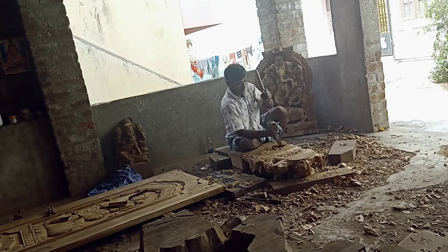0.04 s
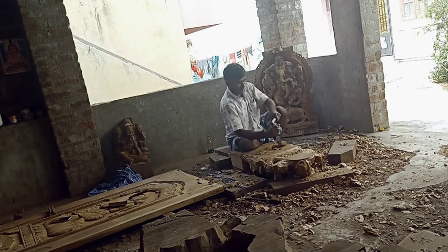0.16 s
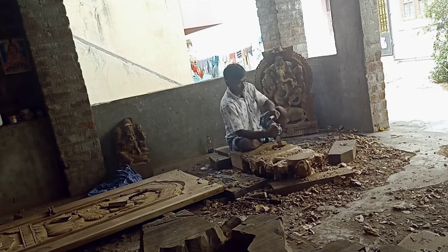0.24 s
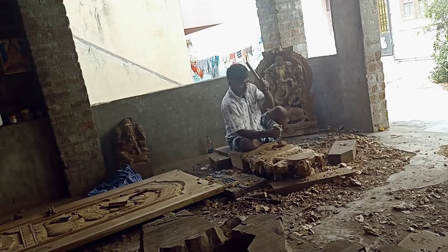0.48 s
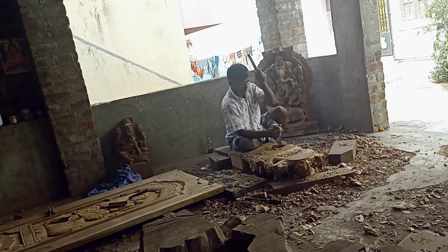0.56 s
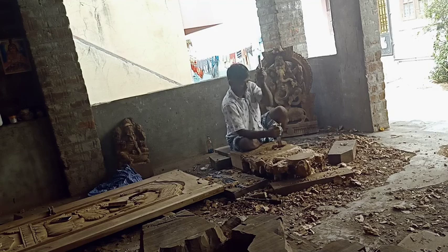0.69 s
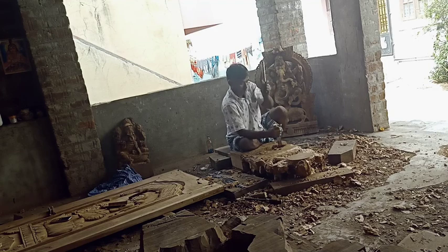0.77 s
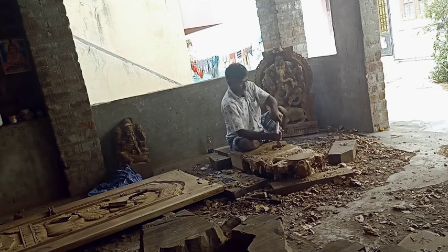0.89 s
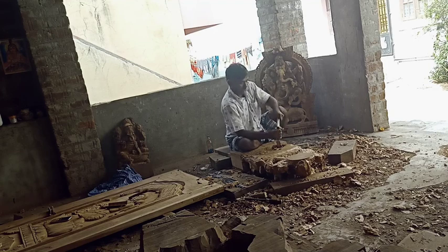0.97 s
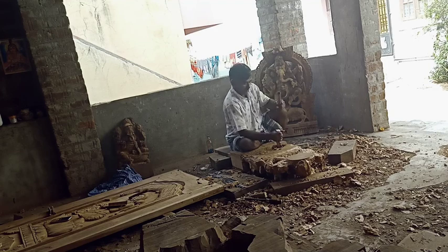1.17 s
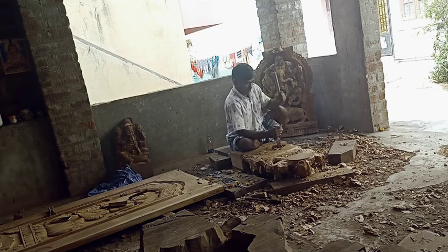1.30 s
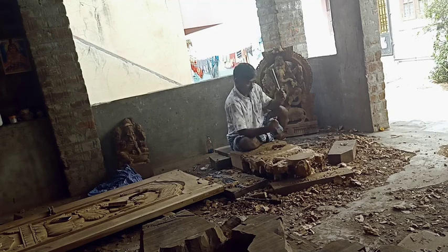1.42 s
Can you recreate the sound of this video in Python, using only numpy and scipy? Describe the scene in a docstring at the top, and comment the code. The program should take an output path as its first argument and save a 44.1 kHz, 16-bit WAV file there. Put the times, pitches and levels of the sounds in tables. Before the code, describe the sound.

Mallet on chisel, carving wood: a muffled tap at the start, another shortly after, then a bright hard blow and low rumble. Chips rustle faintly over quiet open air and a distant wavering drone, in stereo.

```python
"""A hard-walled porch: a woodcarver's mallet meets a chisel in a slab.
Two dull taps seat the chisel, then one sharp blow cracks; a low rumble swells after it.
Contacts are coloured noise shaped by the porch; slab, handle and steel are damped, wavering sinusoids.
Chips rustle faintly as short band-shaped hisses.
Behind them, diffuse noise makes the outdoor air and narrow noise bands make a distant, wavering drone."""
import sys
import numpy as np
from scipy import signal
from scipy.fft import rfft, irfft, next_fast_len
from scipy.io import wavfile
from scipy.ndimage import map_coordinates

SR = 44100
rng = np.random.default_rng(int(sys.argv[2]) if len(sys.argv) > 2 else 0)


def persist_wave(psi):
    """Save psi, clipped to +-1, as 16-bit WAV."""
    counts = np.round(np.clip(psi, -1, 1) * 32767).astype(np.int16)
    wavfile.write(sys.argv[1], SR, np.atleast_2d(counts).T)


N = 63945  # length [samples]

# Side over mid of air and drone: (frequency [Hz], level [dB])
AIR_SIDE = [(60, -12), (120, -1), (240, -14), (480, -5.5), (950, 1), (1890, 0), (3770, 0), (7520, -0.5),
            (15000, 0)]
# How slowly each frequency builds up in the porch: (frequency [Hz], rise time [s])
BUILD = [(100, 0.0097), (250, 0.0099), (600, 0.0023), (1500, 0.00048), (3000, 0.00078), (6000, 0.0024),
         (12000, .001)]
RING_WAVER = 0.27  # depth of the waver in slab and handle, as a share of the steady tone


def amp(db):
    """Decibels to a linear gain."""
    return 10 ** (np.asarray(db) / 20)


def unit(x):
    """Scale to rms 1 over all channels."""
    return x / np.sqrt(np.mean(x ** 2) + 1e-20)


def along(points, hz):
    """Read a curve of (frequency [Hz], value) points on a log frequency axis."""
    f, v = np.transpose(points)
    return np.interp(np.log(hz + 1), np.log(f + 1), v)


def since(s):
    """Seconds since time s, zero before it."""
    return np.maximum(np.arange(N) / SR - s, 0)


def fade(t, t60):
    """Exponential decay that falls 60 dB in t60 seconds."""
    return np.exp(-np.log(1000) * t / t60)


def rise(t, rise_s):
    """Soft exponential onset from 0 towards 1."""
    return 1 - np.exp(-t / rise_s)


def wobble(rate):
    """A smooth random curve through rate knots a second."""
    knots = rng.standard_normal(size=512)
    return map_coordinates(knots, [np.arange(N) * rate / SR + 2], mode="mirror")


def filtered(x, response):
    """Multiply the spectrum of x by a response of frequency, with padding for the tail."""
    m = next_fast_len(N + SR // 2)
    return irfft(rfft(x, m) * response(np.fft.rfftfreq(m, 1 / SR)), m)[..., :N]


def panned(x, pan_db):
    """Make the left channel pan_db louder than the right."""
    return x * amp(np.array([[.5], [-.5]]) * pan_db)


def noise(spectrum, side):
    """Coloured stereo noise of rms 1, with a stereo width for each frequency."""
    def mid_side(hz):
        width = amp(along(side, hz))
        balance = np.array([np.ones_like(hz), width]) / np.hypot(1, width)
        return amp(along(spectrum, hz)) * balance
    mid, side_part = filtered(rng.standard_normal((2, N)), mid_side)
    return unit(np.array([mid + side_part, mid - side_part]))


def air():
    """Outdoor air: diffuse noise, with a share that comes through the opening on the right."""
    # Colour of the air, relative: (frequency [Hz], density [dB per Hz])
    air_colour = [(15, -50), (25, -34), (38, -30), (92, -33), (111, -15), (123, -22), (223, -14.5),
                  (270, -15), (344, -20.5), (405, -8.5), (531, -13), (575, -5.5), (677, -13), (887, -9),
                  (988, -16.5), (1330, -17.5), (2220, -12.5), (2550, -12), (3250, -24.5), (5880, -24),
                  (9570, -53), (13600, -42), (16000, -62)]
    share_db, left_lag_s = -7.5, 0.000393  # share from the right, its lag at the left ear
    ear_lags_s = np.array([[1], [0]]) * left_lag_s
    source = noise(air_colour, AIR_SIDE)[0]
    from_right = filtered(source, lambda hz: np.exp(-2j * np.pi * hz * ear_lags_s))
    level_db = -53.5 + 0.13 * wobble(8.8)
    return (noise(air_colour, AIR_SIDE) + amp(share_db) * from_right) * amp(level_db)


def drone():
    """Narrow distant resonances on a broad base; low, middle and high parts swell separately."""
    # Resonances: (centre [Hz], modulation rate [knots/s], level before the swells [dB])
    resonances = [(352, 18, -69.5), (420, 30, -71), (597, 10, -65.5), (784, 14.17, -71.5),
                  (884.5, 23, -66.5), (1958, 40, -70), (2462, 20, -68.5)]
    # Swells of the parts: (time [s], low [dB], middle [dB], high [dB])
    swells = [(0, -11, 5, -2), (.12, -1, 3, 7.5), (.35, 0, -2, -8.5), (.6, 2, -0.5, -11), (.7, -1, -1, 6),
              (.78, 2.5, 1, -3.5), (.88, -2, -3.5, 8), (.96, -2, 6.5, -4), (1.06, -8, -17, -13),
              (1.2, 3, 10, 2), (1.27, 7, 11, 1), (1.35, -1, -3, -3), (1.41, -2, 11, 0.5), (1.45, 4, 0, 8)]
    # Edges between low, middle, high and the unswelling top: frequency [Hz]
    part_edges = [500, 700, 1200]
    # Colour of the broad base, relative: (frequency [Hz], density [dB per Hz])
    base_colour = [(100, -69), (200, -25), (310, 7), (450, 8.5), (560, -17), (1200, -120)]
    base_db = -62.5  # before the low part's swell
    t = since(0)
    times, *columns = np.transpose(swells)
    parts_db = [np.interp(t, times, column) for column in columns] + [0]
    out = noise(base_colour, AIR_SIDE) * amp(base_db + parts_db[0])

    def narrow_band(hz, rate):
        carrier = np.exp(2j * np.pi * hz * t)
        return unit(np.real((wobble(rate) + 1j * wobble(rate)) * carrier))

    for hz, rate, db in resonances:
        mid = narrow_band(hz, rate)
        side = narrow_band(hz, rate) * amp(along(AIR_SIDE, hz))
        part_db = parts_db[np.searchsorted(part_edges, hz)]
        out += amp(db + part_db) * np.array([mid + side, mid - side])
    return out


def rumble():
    """A low, nearly mono rumble of filtered noise that swells after the blow."""
    # Colour, relative: (frequency [Hz], density [dB per Hz])
    rumble_colour = [(15, -120), (25, -50), (36, -18), (48, 0.5), (62, -14), (80, -2.5), (100, -11),
                     (125, -23.5), (250, -55), (600, -120)]
    # Loudness over time: (time [s], level [dB])
    rumble_level = [(0, -70), (0.108, -61), (.17, -74), (.28, -67), (.395, -63), (.425, -52.5),
                    (.47, -48.5), (.56, -59), (.62, -67), (.69, -56.5), (.8, -67), (.95, -68), (1.45, -70)]
    level_db = np.interp(since(0), *np.transpose(rumble_level))
    return amp(level_db) * noise(rumble_colour, [(50, -20)])  # side 20 dB under mid


def crack(s, spectrum, build_s, stretch=1):
    """A contact spread by the porch: dense reflections, strong walls, slow bass, short-lived treble."""
    # Side over mid of the contact: (frequency [Hz], level [dB])
    knock_side = [(60, -27), (110, -20), (200, -20), (380, -10.5), (700, -1), (1290, 2), (2380, -3),
                  (4400, 2.5), (8120, -1), (15000, 1.5)]
    # Left over right: (frequency [Hz], level [dB])
    knock_pan = [(200, 1.5), (600, 1), (1300, 0.5), (2500, -0.2), (5000, -0.5), (12000, 2)]
    # Early decay of the porch, before the stretch: (frequency [Hz], t60 [s])
    porch = [(100, 0.54), (250, 0.53), (700, 0.38), (2000, 0.32), (5000, 0.26), (12000, 0.22)]
    # Wall echoes: (delay [s], width [s], level over the tail [dB])
    walls = [(.0022, 0.0012, -11), (0.0122, 0.0027, -2.5), (0.032, 0.0046, -11.5), (0.045, 0.0018, -25)]
    late_db, late_t60_s = -19.5, 0.64  # quieter, longer second decay
    dense = filtered(noise(spectrum, knock_side), lambda hz: panned(1, along(knock_pan, hz)))
    hz, frames, z = signal.stft(dense, SR, nperseg=256)
    age = np.maximum(frames - s, 0)
    early = fade(age, stretch * along(porch, hz)[:, None])
    decay = np.hypot(early, amp(late_db) * fade(age, late_t60_s))
    build = rise(age + frames[1] / 2, along(BUILD, hz)[:, None])
    tail = signal.istft(z * decay * build, SR, nperseg=256)[1][:, :N]
    t = since(s)
    # Each wall is a brief bump in the level of the tail
    echoes = sum(amp(db) * np.exp(-((t - delay) / width) ** 2) for delay, width, db in walls)
    return tail * rise(t, build_s) * (1 + echoes)


def ring(s, hz, t60, rise_s, waver, lead=0):
    """One damped mode, made to waver at each ear by the reflections; lead is left-right phase."""
    t = since(s)
    drift = 1 + waver * np.array([wobble(53.34) + 1j * wobble(55.1) for ear in range(2)])
    phase = 2 * np.pi * (hz * t + rng.random()) + np.array([[.5], [-.5]]) * lead
    return np.real(drift * np.exp(1j * phase)) * rise(t, rise_s) * fade(t, t60)


def taps():
    """Soft contacts: a dull, treble-poor knock and the quickly speaking damped modes of the slab."""
    # Taps: (time [s], knock level [dB], gain on the slab modes [dB], knock rise time [s],
    # decay stretch [ratio])
    tap_events = [(-.011, -37, -10, .001, 1.1), (0.2063, -36, 1, 0.0068, 1.18)]
    # Colour of the knock, relative: (frequency [Hz], density [dB per Hz])
    tap_colour = [(40, -60), (100, -37), (165, -15), (230, -2), (450, -1), (650, -5.5), (950, 1), (1300, 2),
                  (1550, -2.5), (2000, -1), (2650, -9), (3200, -23.5), (6000, -38), (9000, -77)]
    # Slab modes: (frequency [Hz], level before the tap's gain [dB], t60 [s])
    slab_modes = [(223.6, -41.5, 0.44), (248.2, -35.5, 0.18), (301.8, -39, 0.25), (421, -38, 0.12),
                  (911, -48, .24), (1268, -54, 0.24), (1870, -59, 0.14)]
    thump_delay_s, thump_rise_s = 0.00503, 0.0037
    out = np.zeros((2, N))
    for s, db, thump_db, build_s, stretch in tap_events:
        thump = sum(amp(level) * ring(s + thump_delay_s, hz, t60, thump_rise_s, RING_WAVER)
                    for hz, level, t60 in slab_modes)
        knock = crack(s, tap_colour, build_s, stretch)
        out += amp(db) * knock + amp(thump_db) * thump
    return out


def blows():
    """The full stroke: a bright crack, damped slab and handle modes, and a beating pair in the steel."""
    # Sharp blows: (time [s], crack level [dB])
    blow_events = [(.3900, -18.5)]
    # Colour of the crack, relative: (frequency [Hz], density [dB per Hz])
    crack_colour = [(40, -66), (110, -33), (160, -21.5), (240, -8), (450, -8), (650, -9), (820, -6),
                    (1100, -9.5), (1400, -3), (1850, -6), (2200, -4), (2800, -4), (3350, -9), (3750, -1),
                    (4200, -11.5), (5000, -4.5), (5750, -6.5), (7100, -15.5), (8400, -33.5), (11000, -34.5),
                    (13800, -32), (15000, -35), (16500, -60)]
    # Slab and handle: (frequency [Hz], level [dB], t60 [s], left-right phase [rad])
    wood_modes = [(243.7, -28.5, 0.24, 0), (321.5, -32.5, 0.28, 0.55), (401, -32.5, 0.22, 1.2),
                  (544, -33, 0.27, -1.1), (797, -27.5, 0.13, -0.8), (1380, -22.5, 0.18, -1.5),
                  (1518, -21.5, 0.21, -2), (1760, -34, .22, 0.1), (2190, -24.5, 0.27, -2.34),
                  (2490, -31, 0.36, -3.6), (2584, -38, 0.23, -3.7), (2716, -31, 0.18, 1.7),
                  (4714, -33, 0.11, -6.5), (4965, -30.5, 0.21, -1.5), (5340, -32.5, 0.28, 1.5),
                  (5362, -32, 0.14, 0.5), (5718, -20.5, 0.066, -0.5)]
    # Chisel steel: (frequency [Hz], level before the swell [dB], t60 [s], left-right phase [rad])
    steel_modes = [(3682, -27.5, 0.41, 1.75), (3740, -28, 0.29, 1.5)]
    crack_rise_s, ring_rise_s, steel_waver = 0.001, 0.0016, .28
    swell_db, swell_delay_s, swell_width_s = 11, 0.058, .0135  # the steel's note swells once
    out = np.zeros((2, N))
    for s, db in blow_events:
        wood = sum(amp(level) * ring(s, hz, t60, ring_rise_s + along(BUILD, hz), RING_WAVER, lead)
                   for hz, level, t60, lead in wood_modes)
        steel = sum(amp(level) * ring(s, hz, t60, ring_rise_s, steel_waver, lead)
                    for hz, level, t60, lead in steel_modes)
        # Fourth power: a flat-topped bump
        swell = np.exp(-((since(s) - swell_delay_s) / swell_width_s) ** 4)
        out += amp(db) * crack(s, crack_colour, crack_rise_s) + wood + steel * amp(swell_db * swell)
    return out


def rustles():
    """Faint, short rustles of wood chips: noise peaking at a centre frequency, rising and decaying."""
    # Rustles: (time [s], level before rise and decay [dB], rise time [s], t60 [s], centre [Hz])
    rustle_events = [(.8, -39, 0.071, 0.36, 2040), (1.042, -55.5, 0.003, 0.26, 4760)]
    # Extra treble shaping: (frequency [Hz], gain [dB])
    rustle_top = [(6000, -0.5), (8000, -12), (13500, -1.5), (16000, -12)]
    slope_db = 15.5  # fall per octave either side of the centre, before the treble shaping
    out = np.zeros((2, N))
    for s, db, rise_s, t60, centre in rustle_events:
        def colour(hz):
            octaves = np.abs(np.log2((hz + 1) / centre))
            return amp(-slope_db * octaves + along(rustle_top, hz))
        hiss = unit(filtered(rng.standard_normal((2, N)), colour))
        out += amp(db) * hiss * rise(since(s), rise_s) * fade(since(s), t60)
    return out


def scene():
    """Air and drone, tilted slightly to the left, under the rumble and the carving."""
    background = panned(air() + drone(), 1.54)
    return background + rumble() + taps() + blows() + rustles()


def record(dry):
    """A very steep low-pass: almost nothing remains above the band limit."""
    top_hz = 15600
    return filtered(dry, lambda hz: 1 / np.sqrt(1 + (hz / top_hz) ** 80))


dry = scene()
out = record(dry)
persist_wave(out)
```